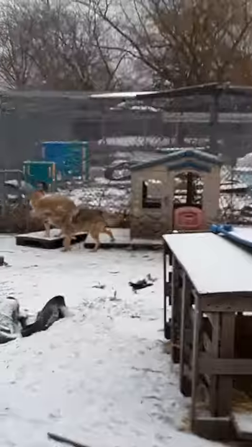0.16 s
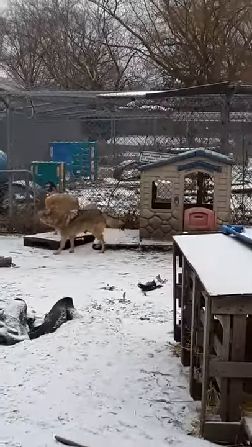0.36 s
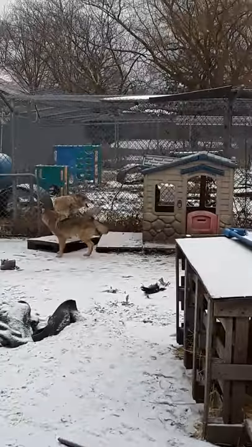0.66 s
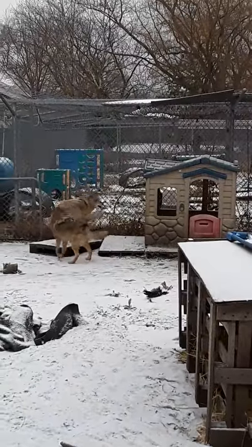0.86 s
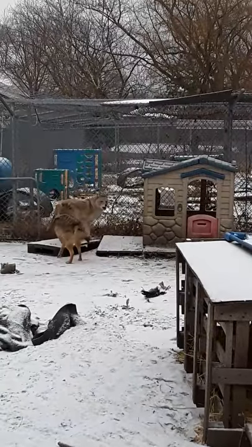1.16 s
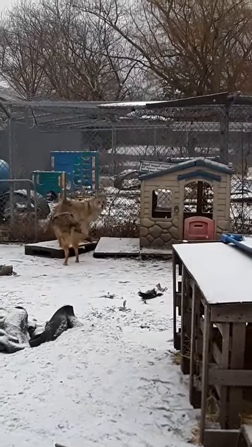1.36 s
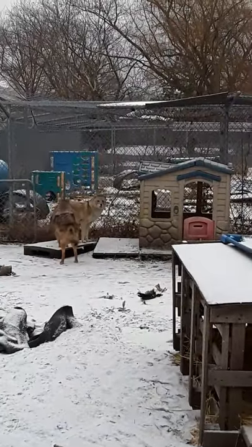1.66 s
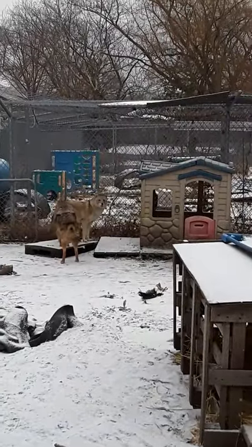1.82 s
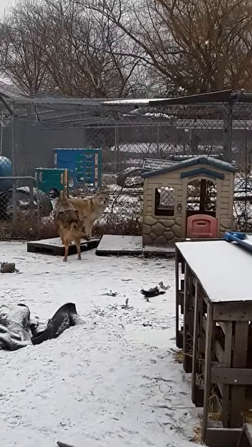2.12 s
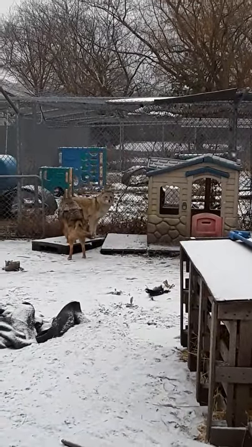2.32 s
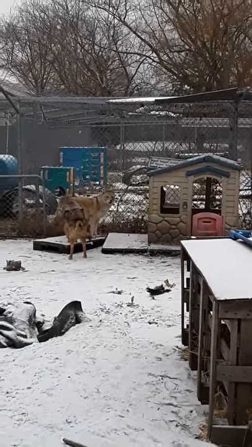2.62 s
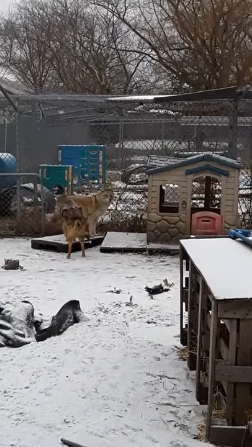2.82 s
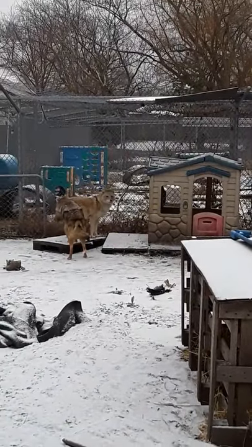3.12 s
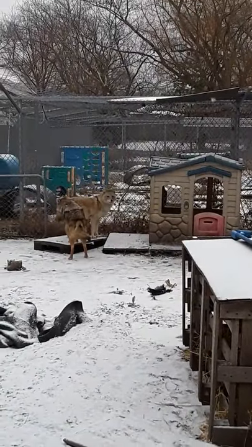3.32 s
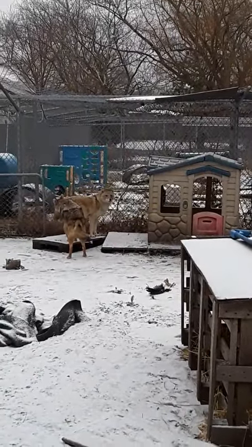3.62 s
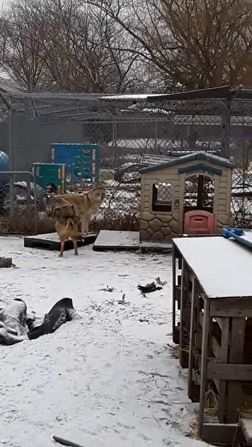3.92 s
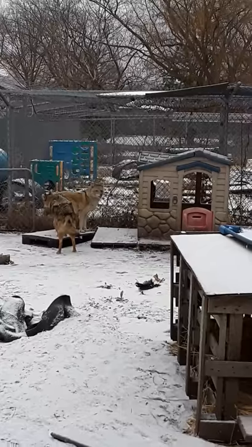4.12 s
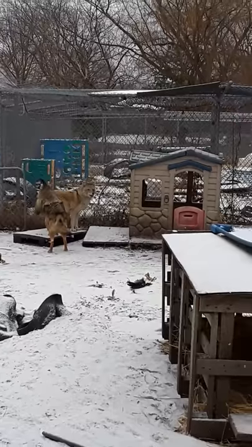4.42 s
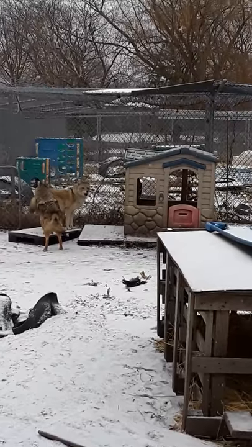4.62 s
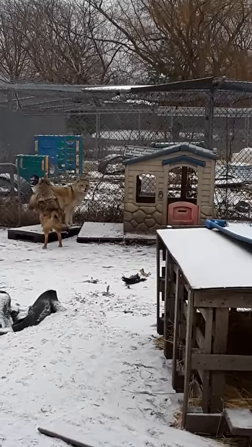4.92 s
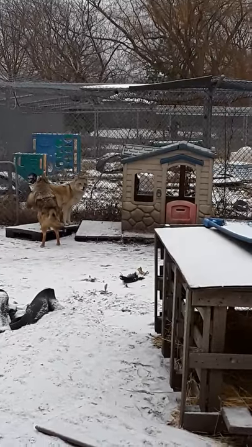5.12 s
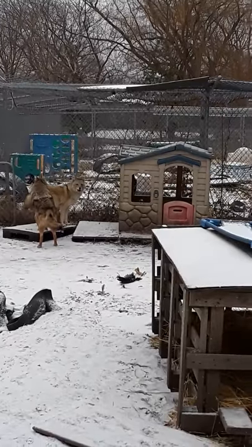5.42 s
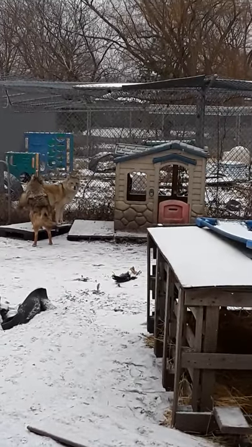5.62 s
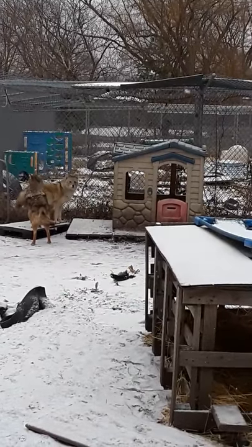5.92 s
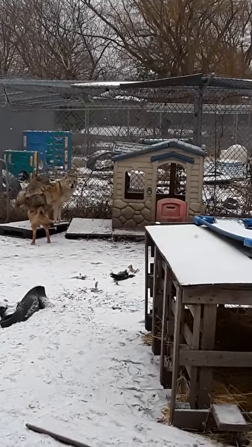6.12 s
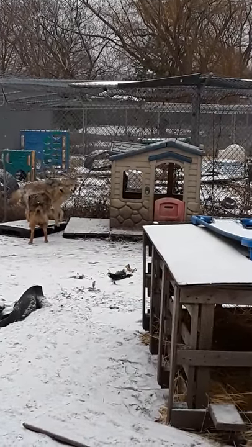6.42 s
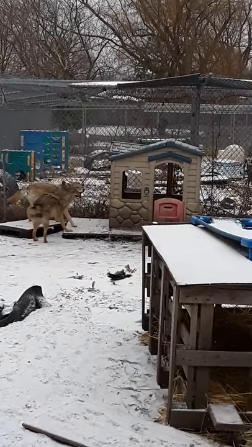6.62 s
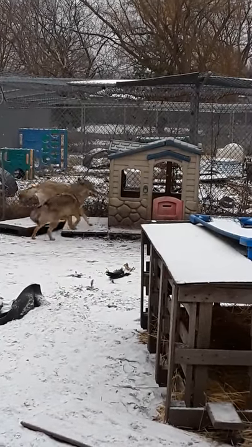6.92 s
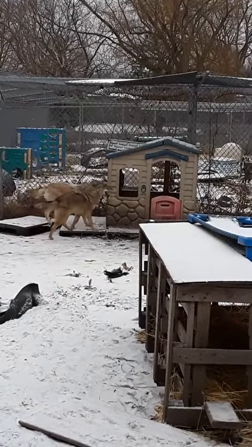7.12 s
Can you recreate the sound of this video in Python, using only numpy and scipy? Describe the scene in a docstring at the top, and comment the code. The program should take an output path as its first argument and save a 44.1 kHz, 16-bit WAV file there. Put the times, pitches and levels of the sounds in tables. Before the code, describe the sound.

Outdoors, short excited canine yips tumble over one another, pure ones mixed with raspy ones, with fine piercing squeaks between. After a busy opening they become quieter and sparser, a soft whine falls through the lull, and scattered yelps resume, growing dense and loudest near the end. A few faint low bumps and distant rumble sit underneath. The animals are heard across a pen, with quick reflections and a light airy tail.

```python
"""Two coyotes yip, yelp and whine over each other in an outdoor pen, with thin whistled squeaks in between.
Each yip is a stack of harmonics that arches in pitch and strength, pure or hoarse; a squeak is a gliding whistle.
One long whine fills the lull. Huts and fences throw the calls back, and the trees add a diffuse tail.
A few soft low bumps are decaying low tones; a distant rumble and faint air are coloured noise underneath."""
import sys
import numpy as np
from scipy import signal
from scipy.fft import rfft, irfft, next_fast_len
from scipy.io import wavfile
from scipy.ndimage import map_coordinates

SR = 44100
rng = np.random.default_rng(int(sys.argv[2]) if len(sys.argv) > 2 else 0)


def put_to_file(sound):
    """Save the sound as 16-bit audio at rate SR, in the file named by the first command-line argument."""
    columns = np.atleast_2d(sound).T  # one column per channel
    safe = np.clip(columns, -1, 1)
    whole_steps = np.round(safe * 32767)
    wavfile.write(sys.argv[1], SR, whole_steps.astype(np.int16))


N = 320166
TOP_HZ = 15750  # nothing sounds above this


def amp(db):
    """Decibels to gain."""
    return 10 ** (np.asarray(db) / 20)


def semitones(steps):
    """Semitones to a pitch ratio."""
    return 2 ** (steps / 12)


def unit(x):
    """Scale to rms 1."""
    return x / np.sqrt(np.mean(x ** 2) + 1e-20)


def along(points, hz):
    """Read a value between (Hz, value) points, on a logarithmic pitch axis."""
    point_hz, value = np.transpose(points)
    return np.interp(np.log(hz + 1), np.log(point_hz), value)


def wobble(rate, size):
    """A smooth random curve with rate random points a second."""
    knots = rng.standard_normal(int(size * rate / SR) + 4)
    return map_coordinates(knots, [1 + np.arange(size) * rate / SR])


def noise(spectrum, size):
    """Random hiss given a tone colour, at rms 1."""
    hz = np.fft.rfftfreq(size, 1 / SR)
    white = rng.standard_normal(size)
    return unit(irfft(rfft(white) * amp(along(spectrum, hz)), size))


def add(track, start, x):
    """Mix a stereo sound into a track from a start sample on."""
    part = x[:, :max(N - start, 0)]
    track[:, start:start + part.shape[1]] += part


def span(start_s, length, fade):
    """Start sample, clock in seconds and soft on-off gate of one call."""
    start = max(int((start_s - fade / 2) * SR), 0)
    t = np.arange(start, int((start_s + length + fade / 2) * SR)) / SR
    inside = np.minimum(t - start_s, start_s + length - t)
    gate = np.sin(np.pi / 2 * np.clip(inside / fade + .5, 0, 1)) ** 2
    return start, t, gate


def arch(progress, crest, rise, fall):
    """A curve that climbs by rise to zero at the crest, then drops by fall; progress runs from 0 to 1."""
    crest = np.clip(crest, .1, .9)
    before = np.clip(1 - progress / crest, 0, 1)
    after = np.clip((progress - crest) / (1 - crest), 0, 1)
    return -rise * before ** 2 - fall * after ** 2


def yips(level_db):
    """Pitch and effort arch together; as the mouth closes, strength passes from overtones to fundamental."""
    # one row per yip or yelp: start_s, length_s, crest (share of the length), crest_pitch_hz,
    # scoop_semitones (up to the crest), sag_semitones (after it), fundamental_db (before the overall level),
    # then relative to the fundamental: second_harmonic_db, third_harmonic_db, upper_harmonics_db;
    # extra_treble_db, mouth_closing_db, hoarseness (0-1, higher is capped), reflected_share (0-1),
    # left_minus_right_db (without the tail from the trees)
    yip_rows = [(-0.024, 0.051, 0.36, 796, 2, 1.5, -26, -12.5, -12.5, -20, 2, -4, 0.9, 0.7, -0.5),
                (0.051, 0.066, 0.56, 689.4, 4.5, 0.8, -49.0, 17, 1.5, 4, 1.5, 10, 0.3, 0.7, 0.5),
                (0.109, 0.12, 0.38, 785.4, 2.5, 2.7, -22.0, -12.0, -16, -23, 1.5, 1.5, 0.1, 0.6, 0),
                (0.17, 0.092, 0.47, 491, 2.4, 2.5, -42.5, 8, 9, -3, 4.5, -1.0, 0.6, 0.5, 0.5),
                (0.197, 0.27, 0.17, 628.3, -0.9, -4, -31, -6.5, -22.5, -22.5, 10, -1, 0.2, 0.5, 0.5),
                (0.288, 0.094, 0.3, 951, 0.0, 0.75, -32.5, 13.0, -5.5, -8, -1.5, 3, 0.04, 0.6, -1),
                (0.447, 0.13, 0.35, 660, 2, -0.5, -28.5, -3, 0, -10.5, -8, 6.5, 0.88, 0.74, -0.5),
                (0.675, 0.082, 0.68, 820.3, 1.94, -3, -18.5, -0.5, -11.5, -18.5, 1.5, 6, 0.1, 0.3, 1.0),
                (0.7, 0.11, 0.44, 745.0, 3.5, 3.2, -27, -6.5, -9.0, -15.5, 2, -10.5, 0.3, 1, -1.5),
                (0.817, 0.051, 0.56, 780, 3, -2.3, -26.5, -6.5, -2, -9, -0.5, 15.5, 0.7, 1, 0.5),
                (0.843, 0.087, 0.38, 1035, -3, 5.5, -26, -7, -17, -15.5, 5, 1, 1, 0.4, -0.5),
                (0.902, 0.18, 0.24, 850, 1.7, 1, -37, -3.5, 5, -7.5, -9, 2, 0.44, 1, -2.0),
                (0.903, 0.072, 0.31, 693, -1.2, 1.2, -38, 8.5, 5.5, -2, -0.5, 9, 0, 0.2, 0),
                (1.082, 0.053, 0.43, 739, 1.2, 2.3, -20.5, 4.5, 0.5, -11.5, -5.5, 8.5, 0.42, 0.8, -0.5),
                (1.109, 0.084, 0.28, 841, -4, 0.6, -28, 1, -18.5, -11, -1.5, 16.5, 0.3, 1, -2),
                (1.222, 0.051, 0.59, 806.7, 1, -0.84, -27, -10, -19, -16.5, 11.5, 23, 0.08, 0.5, -2),
                (1.263, 0.069, 0.72, 781, 2, -1, -29.5, 11.5, 2.5, -5, -7, -10, 0.4, 0.5, -1.5),
                (1.316, 0.096, 0.4, 922, 2, 0.9, -29.5, -11, -4, -15, 3, 15.5, 0.5, 0.4, 3),
                (1.319, 0.12, 0.15, 836, -0.8, 1.4, -26.5, -3.5, -12.5, -19, 1, -6.5, 0.1, 0.8, 0.0),
                (1.545, 0.15, 0.56, 520, 0.7, 0.7, -50.5, 8, 1.0, -15.5, 1.5, 10, 0.9, 0.6, 1),
                (1.678, 0.091, 0.58, 637.5, 3.5, -0.4, -35, -2, 1.5, -20, 2, 7.0, 0.6, 0.5, -1.5),
                (1.747, 0.053, 0.51, 781, 2.5, 1.5, -24, 2.5, -5.5, -10.5, 2.5, 12.5, 0.19, 0.32, 1),
                (1.85, 0.36, 0.65, 539.0, -0.9, 2, -45.5, -6.5, -6.5, -23, -1.0, 15, 0.3, 0.97, 1.5),
                (2.117, 0.079, 0.26, 700, 0.9, -0.8, -39.5, -6.5, -4, -14.5, -9, 2, 0.7, 0.6, 0.5),
                (2.201, 0.11, 0.46, 728.0, 4.5, 4, -24.5, -3, -4.5, -19.5, 1.5, -5, 0, 0.6, 0.5),
                (2.264, 0.11, 0.11, 727, -0.0, 2.1, -29, -7.5, -9.5, -21, 4.5, -15, 0.36, 0.9, 0),
                (2.378, 0.068, 0.53, 692.5, 0, 6.5, -32, 1.5, -6, -19.5, 0, 8.0, 0.1, 0.9, -1),
                (2.474, 0.046, 0.61, 920.0, -1.5, 1, -30, 7.5, 2, -9, 5.5, -8, 0.05, 0.46, 1.5),
                (2.532, 0.094, 0.56, 703, 2.5, 5, -32.5, 2, 1, -13.5, 1.5, -3, 0.1, 0.6, 0.5),
                (2.611, 0.046, 0.27, 702, 0.4, 1.5, -51.5, 13, 20.5, 3.5, -0.5, 5, 0.4, 0.9, 0.5),
                (2.666, 0.042, 0.62, 1033, -3, 1, -37, 5.5, -12.0, -7.5, 10.5, -24, 0.3, 0.4, 0.0),
                (2.714, 0.08, 0.48, 671.5, 2, 2.5, -35, -1.0, 5, -10.5, -3, -2, 0, 0.9, 0.5),
                (2.801, 0.077, 0.39, 728.0, 1.2, 2, -35, -6.5, -4, -17.5, -4, -1, 0.5, 0.7, 0.0),
                (2.901, 0.13, 0.44, 662, 1.3, 0.8, -41, -1.5, 2.0, -15.5, 4, -0.5, 0.1, 0.8, 1.5),
                (3.082, 0.11, 0.4, 721.0, 2.1, 1, -35.5, 6, 1.5, -15.5, 0.5, -7.5, 0.19, 1, 0),
                (3.263, 0.12, 0.45, 805, 3.5, 2.46, -31.5, 1, -6.0, -18.5, 4, 2, 0.2, 0.4, 0.5),
                (3.389, 0.067, 0.63, 797, 2.5, 4, -56.5, 21, -17, -9, -6.0, 10, 0.08, 0.5, -4.0),
                (3.498, 0.057, 0.54, 789, -1.0, -6.5, -30, 7.5, -1.5, -10.5, 10.0, 9.5, 0, 0.2, 0.5),
                (3.725, 0.16, 0.34, 489.2, 1.9, 0.7, -48, 1, 5, -20, 3.0, -3, 1.2, 0.1, 3.5),
                (4.45, 0.16, 0.57, 694, 6, 3.1, -22, -6.5, -4.5, -29.5, 11, -4.5, 0.54, 0.37, 2),
                (4.465, 0.067, 0.52, 766, 0.44, 2.5, -28.5, 1, -10, -7.5, -2, 13.5, 0.08, 0.4, 0),
                (4.61, 0.043, 0.51, 927, 2.3, -3, -36, 11.0, -0.5, -4.0, 1.5, -5, 0.3, 0.9, 0),
                (4.66, 0.037, 0.54, 1243, 2.5, 4.5, -30.0, -5.5, -25, -7.5, 7, -5.0, 0.0, 0.3, 0.0),
                (4.934, 0.091, 0.32, 495, 1, 0.1, -45.5, 2, 6.0, -10, -9.5, 2, 0.3, 1, 0),
                (5.114, 0.063, 0.56, 772, -1.5, 0.4, -38.5, 2.5, -5.5, -8.5, -4, 21.5, 0.03, 0.26, 1.5),
                (5.341, 0.26, 0.51, 583.7, 2.5, 1.7, -45.5, -7, -11, -20, 1.0, 15.5, 0.3, 0.5, 0.5),
                (5.428, 0.069, 0.57, 976.6, 1.2, 1.3, -30.5, 11.5, 4, -4.5, 6.5, 2, 0.0, 0, -0.5),
                (5.643, 0.085, 0.44, 842.5, 3, -1.8, -23.0, -12.5, -10.5, -21.0, -16.5, -1.5, 0.08, 0.7, 0),
                (5.648, 0.121, 0.14, 617, 0, 0.9, -43.5, -4, -16, -7, -4, -4, 0, 0.1, 0.0),
                (5.758, 0.048, 0.43, 620, 1, -1.1, -50, 19, -5, -7.5, 5, -6, 0.1, 0.5, 0.5),
                (5.848, 0.056, 0.44, 900.5, 0.6, -2.5, -34, 5, -6.5, -10.5, 10.5, 3, 0.1, 0.48, 0),
                (6.003, 0.092, 0.47, 927.5, 3.5, -0.0, -22.5, -5.0, -10.0, -22.5, -4, 4, 0.06, 0.3, 0.5),
                (6.004, 0.18, 0.15, 646, 0.5, 0.6, -33, -15, -9, -19.0, 0.5, -11.5, 0.08, 0.3, 0),
                (6.213, 0.102, 0.69, 835.3, 3.5, -1.7, -13.0, -3.0, -5.5, -14, 5.5, 6, 0, 0.17, 0.5),
                (6.401, 0.043, 0.62, 926, 4.5, -3.5, -17.5, -4.5, -5, -16, 1.5, 7, 0.1, 0.3, -0.5),
                (6.423, 0.15, 0.44, 1024.0, -1.0, 1.2, -22.0, -3.5, -5.5, -19.5, 7, -4, 0, 0.5, -1),
                (6.63, 0.055, 0.81, 775, 3.5, 1.4, -21.5, 3, 3.5, -10.5, 2, -1, 0.2, 0.4, 0.5),
                (6.671, 0.082, 0.33, 735.5, 3.3, 1.4, -28, 3, 8.5, -2.5, -1, 14.5, 0.6, 0.3, 0),
                (6.681, 0.07, 0.31, 871.7, 3, -0.6, -19.0, -9.5, -39, -18, -7.5, 6, 0.2, 0.4, -4),
                (6.822, 0.064, 0.44, 841, 5, 1.8, -18.5, -2.0, -9.5, -14.5, -3, 10.5, 0.4, 0.4, -0.5),
                (6.853, 0.066, 0.5, 647, 1.5, 2.5, -47.5, 27.5, 17, 21, -5.5, 7, 0.66, 0.21, 0.5),
                (6.908, 0.066, 0.37, 887, -1.6, 0.5, -22, -12.5, -9.5, -8.0, -6.5, -13, 0.3, 0.3, 0.5),
                (7.052, 0.087, 0.51, 671, 3.5, 0.5, -33.0, 3, 5.5, -13, -7.5, -8, 0.4, 0.6, -0.5),
                (7.102, 0.083, 0.81, 877.5, 5, -1.2, -16.0, -7.5, -20.5, -19, 0.5, 10, 0.24, 0.2, 1),
                (7.183, 0.063, 0.31, 1020, 0, -2, -29, -1.5, -21, -15.5, -1.0, 8, 0.3, 0.3, 0.5),
                (7.215, 0.072, 0.79, 787, 5, 0.5, -17, -13.0, -10.0, -22.0, -1, 5, 0.4, 0.9, 0)]
    swell_db, die_db = 9.5, 12.5
    # a yip whose fundamental is above loud_db swells from further down: extra swell per dB above it
    loud_db, loud_swell = -19.5, 1.62
    # upper harmonics crest later (share of the length), with their own swell and decay
    bloom_lag, bloom_db, wilt_db = .07, 10.5, 10.5
    # treble grows through a yip as the throat tightens
    tighten_db = 2.5
    # a hoarse yip starts clean: share of its length until it is fully rough
    break_up = 0.3
    out = np.zeros((2, N))
    for (s, length, crest, hz, scoop, sag, db, second, third, upper,
         treble, closing, hoarse, indirect, pan_db) in yip_rows:
        start, t, gate = span(s, length, fade=.016)
        progress = np.clip((t - s) / length, 0, 1)
        pitch = hz * semitones(arch(progress, crest, scoop, sag))
        push = loud_swell * max(db - loud_db, 0)
        effort = arch(progress, crest, swell_db + push, die_db)
        bloom = arch(progress, crest + bloom_lag, bloom_db + push, wilt_db)
        mouth = closing * (progress - crest)
        overtones = effort - mouth
        harmonics = db + np.array([effort + mouth, second + overtones, third + overtones, upper + bloom])
        rough = hoarse * np.clip(progress / break_up, 0, 1)
        call = voice(pitch, harmonics, rough, treble_db=treble + tighten_db * (progress - crest))
        add(out, start, pen(gate * call, indirect, pan_db))
    return amp(level_db) * out


def whine(level_db, second_db, third_db, upper_db, closing_db):
    """A long, nearly pure note that sinks and dulls as the mouth closes."""
    # path of the whine: time_s, pitch_hz, level_db (before the overall level)
    whine_path = [(3.88, 511.9, -42.5), (3.922, 565, -41.5), (4.286, 536.7, -40), (4.352, 518, -36.5),
                  (4.42, 431, -51)]
    out = np.zeros((2, N))
    s, hz, db = np.transpose(whine_path)
    start, t, gate = span(s[0], s[-1] - s[0], fade=.03)
    pitch = np.interp(t, s, hz)
    level = level_db + np.interp(t, s, db)
    overtones = level - closing_db * np.linspace(0, 1, len(t))
    harmonics = [level, overtones + second_db, overtones + third_db, overtones + upper_db]
    note = voice(pitch, harmonics, hoarse=.02, treble_db=-7)
    add(out, start, pen(gate * note, indirect=0.52, pan_db=1.0))
    return out


def voice(pitch, harmonics_db, hoarse, treble_db, jitter=0.016, tremor=0.007, flutter=0.54, half_db=-5, rasp_db=2,
          breath_db=-11.0, upper_db=-1.5, shimmer_db=5.5, dull_db=-5.0, smear=1.05, steady_harmonics=7.8):
    """Vocal folds on a gliding pitch; hoarseness shakes them, doubles their period and adds rasp."""
    # throat and mouth colour of the upper harmonics: pitch_hz, relative_level_db
    throat = [(1800, 19), (2300, 10), (2900, 0.5), (3400, -10.5), (4100, -16), (5000, -23.5), (6200, -31),
              (7700, -23), (9200, -37), (12000, -37), (15000, -44)]
    # colour of the turbulent air in a call: pitch_hz, relative_level_db (per Hz)
    rasp_colour = [(300, -45.5), (550, -2.5), (800, 1.5), (1150, -2), (1700, 12.5), (2600, 4), (3200, -10),
                   (4100, -32), (5600, -30), (7700, -22.5), (9200, -50.5), (12500, -59), (15500, -50)]
    first, second, third, upper = harmonics_db
    size, hoarse = len(pitch), np.clip(hoarse, 0, 1)
    unsteady = tremor * wobble(60.6, size) + 0.0023 * wobble(900, size)
    pitch = pitch * (1 + unsteady + jitter * hoarse * wobble(300, size))
    phase = 2 * np.pi * np.cumsum(pitch) / SR
    levels = [amp(db + 1.6 * wobble(35, size)) for db in (first, second, third)]
    # upper harmonics flicker, and the softer the call the faster they fall away
    softness = np.clip((-35 - upper) / 25, 0, 1.5)
    for k in range(4, int(TOP_HZ / pitch.mean()) + 1):
        dulling = dull_db * softness * np.clip(np.log2(k * pitch / 2100) / 1.5, 0, 1)
        treble = treble_db * np.clip(np.log2(k * pitch / 3500) / 1.6, 0, 1.3)
        flicker = shimmer_db * wobble(55, size)
        levels.append(amp(upper + upper_db + along(throat, k * pitch) + dulling + treble + flicker))
    # the higher the harmonic, the less steady its phase
    tone = np.zeros(size)
    for k, level in enumerate(levels, 1):
        drift = smear * min(k / steady_harmonics, 1) ** 2 * wobble(280, size)
        tone += level * np.sin(k * phase + rng.uniform(0, 2 * np.pi) + drift)
    # alternate strong and weak cycles put extra tones halfway between the harmonics
    halves = np.zeros(size)
    for k in range(1, len(levels)):
        between = np.sqrt(levels[k - 1] * levels[k])
        halves += between * wobble(70.7, size) * np.sin((k + .5) * phase)
    shaking = 1 + flutter * hoarse * wobble(260, size)
    folds = np.sqrt(2) * (tone + hoarse * amp(half_db) * halves) * shaking
    # air escapes in one puff per cycle
    effort = np.sqrt(amp(upper) * np.sqrt(sum(level ** 2 for level in levels[:3])))
    air_level = hoarse * amp(rasp_db) * effort + amp(upper + breath_db)
    puffs = 1 + 0.43 * np.sin(phase)
    return folds + air_level * noise(rasp_colour, size) * puffs


def squeaks(level_db, tail_db, octave_db, flicker_db):
    """Thin, unsteady arched whistles with a weak octave."""
    # one row per squeak: start_s, length_s, crest_pitch_hz, scoop_semitones (up to the crest),
    # sag_semitones (after it), crest_level_db (before the overall level)
    squeak_rows = [ (0.824, 0.042, 9850, 4.5, -3.5, -61), (1.211, 0.027, 4410, 6.5, -.5, -48.5),
                   (1.905, 0.055, 8000, 1, 1, -64.5), (2.142, 0.11, 5470, 3, 8.5, -65.5),
                   (2.658, 0.045, 5270, 1, 3.5, -53.5), (2.882, .13, 5100, 1, 2, -56.5),
                   (3.66, 0.056, 9740, 0, 1.2, -77), (3.948, 0.095, 5800, 3, 2, -62.5),
                   (4.189, 0.12, 5580, 1.2, 1.8, -64), (4.302, 0.092, 3240, 2.5, 1, -59),
                   (4.61, 0.024, 4900, 2, -4, -63), (4.658, .05, 5200, -1, 5, -47.5),
                   (4.661, 0.025, 10240, 2, 1.3, -46.5), (4.73, .03, 4200, 1, -.3, -55),
                   (5.115, 0.094, 5350, 1, 2, -63.5), (5.388, 0.044, 5280, 1, -1.5, -56),
                   (5.49, 0.018, 4800, -7, 3, -46), (5.527, 0.018, 4200, -2, 3.5, -59),
                   (5.622, 0.073, 4660, .9, 1.5, -60.5), (5.625, 0.084, 9350, 0.5, 2, -64),
                   (5.835, 0.023, 5050, 1.5, -.4, -59.5), (5.89, 0.046, 5050, 6, 2, -52.5),
                   (6.356, 0.15, 8260, 1, -0.5, -52.5), (6.762, 0.06, 8100, 2, 1.1, -58.5)]
    crest, ends_db = 0.36, 6  # crest as share of the length; how much weaker the two ends are
    out = np.zeros((2, N))
    for s, length, hz, scoop, sag, crest_db in squeak_rows:
        start, t, gate = span(s, length, fade=0.0042)
        progress = (t - s) / length
        pitch = hz * semitones(arch(progress, crest, scoop, sag))
        db = crest_db + arch(progress, crest, ends_db, ends_db)
        unsteady_pitch = pitch * (1 + 0.0093 * wobble(200, len(gate)))
        phase = 2 * np.pi * np.cumsum(unsteady_pitch) / SR
        octave = amp(octave_db) * (2 * pitch < TOP_HZ) * np.sin(2 * phase)
        strength = gate * amp(db + flicker_db * wobble(80, len(gate)))
        whistle = strength * (np.sin(phase) + octave)
        add(out, start, walls(whistle, share=0.34, spread=0.022, width=.6))
        add(out, start, amp(tail_db) * trees(whistle, build=.02, width=.8))
    return amp(level_db) * out


def pen(call, indirect, pan_db, tail_db=-19):
    """A call arrives partly straight and partly off the walls, followed by a tail from the trees."""
    indirect = np.clip(indirect, 0, 1)
    sides = amp([[pan_db / 2], [-pan_db / 2]])
    near = sides * walls(call, share=indirect, spread=0.03, width=0.3)
    # a coyote that faces away sends more of its call into the trees
    out = amp(tail_db) * (1 + indirect) * trees(call, build=0.0066, width=0.086)
    add(out, 0, near)
    return out


def ports(pair, width):
    """Blend two unrelated signals into a left and right; a small width makes them mostly alike."""
    middle, side = pair[0], width * pair[1]
    return np.array([middle + side, middle - side]) / np.sqrt(1 + width ** 2)


def walls(x, share, spread, width, ripple=0.61):
    """The straight path plus quick reflections from huts and fences: they smear a call but colour it mildly."""
    t = np.arange(SR // 8) / SR
    strengths = rng.standard_normal((2, len(t)))
    arrivals = rng.random(len(t)) < .03
    paths = ports(strengths * arrivals * np.exp(-t / spread), width)
    share = np.clip(share, 0, 1)
    paths *= np.sqrt(2 * share / np.sum(paths ** 2))
    paths[:, 0] += np.sqrt(1 - share)  # the straight path
    z = rfft(np.pad(paths, ((0, 0), (0, len(t)))))
    # a filter that never acts ahead of time evens out the peaks and notches in tone colour
    cepstrum = irfft(np.log(np.mean(np.abs(z) ** 2, axis=0) + 1e-6))[:len(t)]
    even = np.exp((ripple - 1) * rfft(cepstrum, 2 * len(t)))
    y = signal.fftconvolve(x[None], irfft(z * even)[:, :len(t)], axes=1)
    # keep the energy of the call
    return y * np.sqrt(2 * np.sum(x ** 2) / (np.sum(y ** 2) + 1e-20))


def trees(x, build, width):
    """The diffuse tail: noise that builds up briefly, then each pitch range dies at its own rate."""
    # decay in the pen and the trees: pitch_hz, time_to_fall_60_db_s
    yard = [(300, 1), (900, 0.75), (2000, 0.91), (3500, 0.71), (8000, 0.2), (14000, 0.45)]
    hz, t, z = signal.stft(rng.standard_normal((2, 3 * SR // 4)), SR, nperseg=256)
    decay = amp(-60 * t / along(yard, hz)[:, None])
    tail = signal.istft(z * decay * (1 - np.exp(-t / build)), SR, nperseg=256)[1]
    return signal.fftconvolve(x[None], ports(tail, width) / np.linalg.norm(tail[0]), axes=1)


def bumps(level_db, swell):
    """Each bump is a few low cycles that swell for swell seconds and die."""
    # soft low bumps: start_s, peak_db (of the swell, before the overall level), pitch_hz
    bump_rows = [(2.04, -32, 93.7), (2.146, -30.5, 90), (3.037, -28, 98), (3.259, -34.5, 102),
                 (3.451, -32, 89.4), (4.514, -29, 203), (5.089, -32, 91)]
    out, t = np.zeros((2, N)), np.arange(SR // 6) / SR
    for s, db, hz in bump_rows:
        envelope = t / swell * np.exp(1 - t / swell)
        thud = amp(db + level_db) * envelope * np.sin(2 * np.pi * hz * t)
        add(out, int(s * SR), np.array([thud, thud]))
    return out


def outdoors(rumble_db, air_db):
    """Distant rumble and faint, gently stirring air: coloured noise, nearly the same left and right."""
    # colours of the distant rumble and the air: pitch_hz, relative_level_db (per Hz)
    rumble_colour = [(20, -23), (35, -16.5), (60, -5), (105, 2.5), (180, -3), (300, -8), (500, -13),
                     (900, -13.5), (2000, -77)]
    air_colour = [(200, -30.5), (600, 14), (1200, 6), (2200, -2.5), (3500, -32), (6000, -31), (15000, -37)]
    # slow course of the rumble: time_s, level_db (before the overall level)
    rumble_course = [(0, -51.5), (1.499, -49.5), (2.6, -49), (5.5, -51), (7.26, -48)]
    level = np.interp(np.arange(N) / SR, *np.transpose(rumble_course))
    rumble = ports([noise(rumble_colour, N), noise(rumble_colour, N)], width=0.16)
    air = ports([noise(air_colour, N), noise(air_colour, N)], width=0.17)
    stirring = amp(1.5 * wobble(4, N))
    return amp(level + rumble_db) * rumble + amp(air_db) * stirring * air


def scene():
    """The pair of coyotes in their pen, with the bumps and the outdoor background."""
    animals = yips(level_db=0.59)
    animals += whine(level_db=1.5, second_db=0.0, third_db=-5.5, upper_db=-21.5, closing_db=10)
    animals += squeaks(level_db=2.5, tail_db=-18.5, octave_db=-10, flicker_db=5.5)
    return animals + bumps(level_db=-2, swell=0.0045) + outdoors(rumble_db=1.0, air_db=-45.5)


def record(dry):
    """Left and right are coloured differently, the very loudest peaks are rounded and the top is cut."""
    # difference between the sides: pitch_hz, left_minus_right_db, left_lead_radians
    side_colour = np.array([(100, 1, .1), (400, 2.5, .25), (700, 1.6, 0.34), (1040, 5, 0.9),
                            (1500, 1, 0.08), (1970, -1, 0.6), (2640, -8.5, 1), (3500, -5, -1.8),
                            (5030, 0, -0.91), (8000, 2, -1.1), (12000, 7, .15)])
    size = next_fast_len(N + SR // 4)
    hz = np.fft.rfftfreq(size, 1 / SR)
    level_db = along(side_colour[:, :2], hz)
    lead = along(side_colour[:, ::2], hz)
    left = amp(level_db / 2) * np.exp(.5j * lead)
    # the right is the opposite of the left; their average keeps its strength at every pitch
    response = np.array([left, 1 / left]) / np.abs((left + 1 / left) / 2)
    heard = irfft(rfft(dry, size) * response, size)
    rounded = heard / (1 + np.abs(heard / .9) ** 8) ** (1 / 8)
    return irfft(rfft(rounded) * (hz < TOP_HZ), size)[:, :N]


dry = scene()
out = record(dry)
put_to_file(out)
```